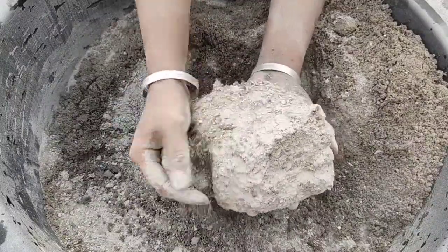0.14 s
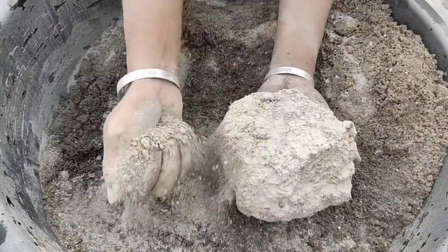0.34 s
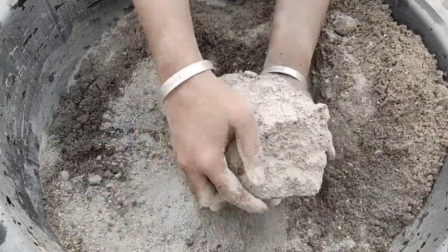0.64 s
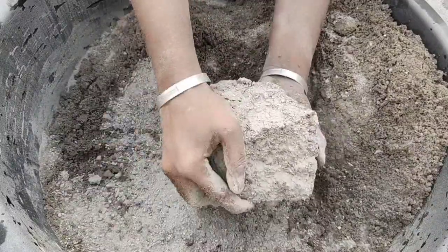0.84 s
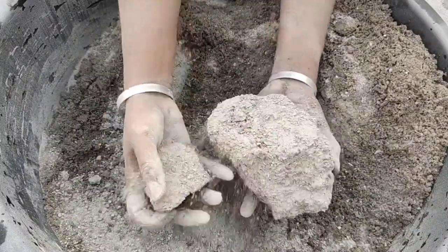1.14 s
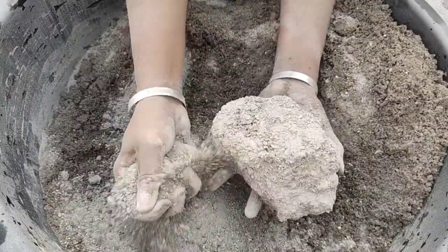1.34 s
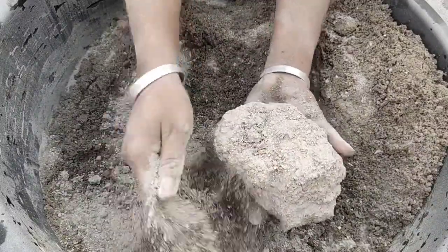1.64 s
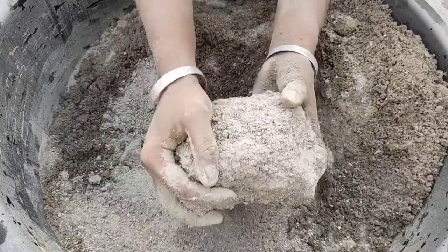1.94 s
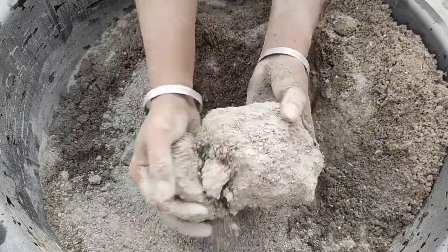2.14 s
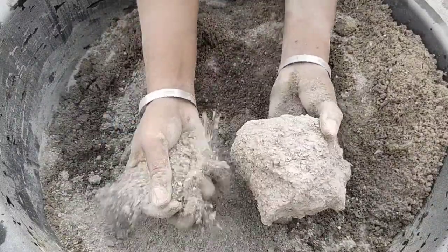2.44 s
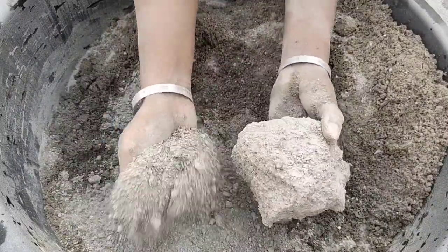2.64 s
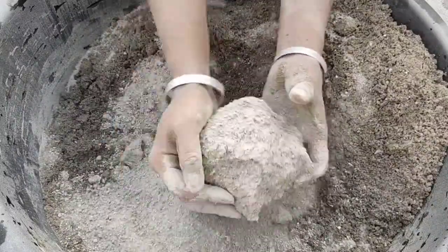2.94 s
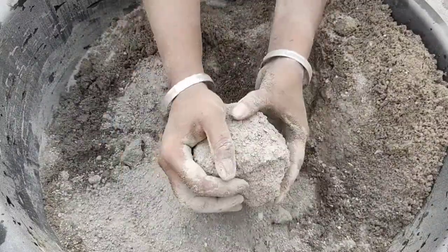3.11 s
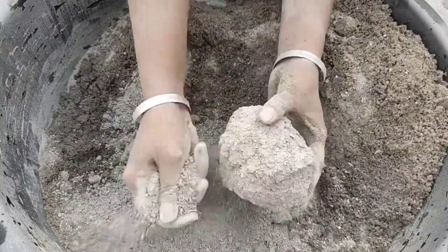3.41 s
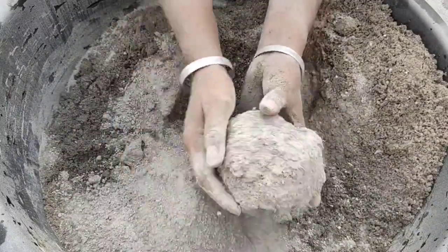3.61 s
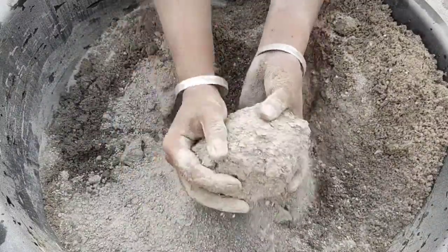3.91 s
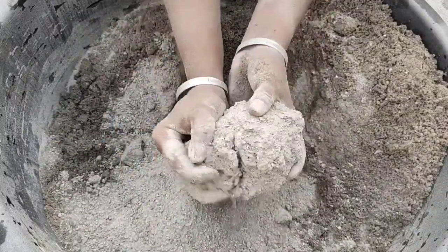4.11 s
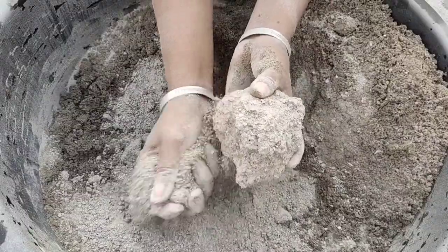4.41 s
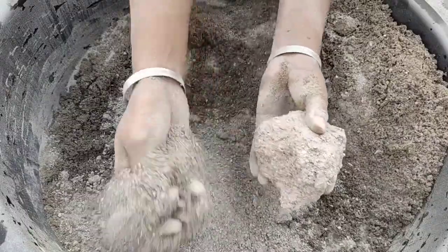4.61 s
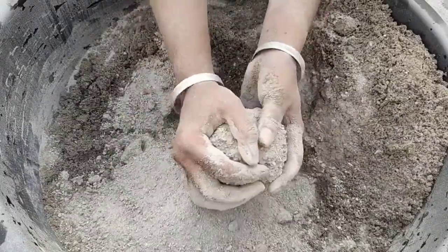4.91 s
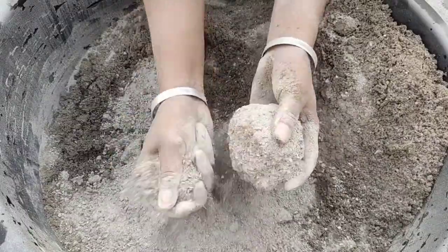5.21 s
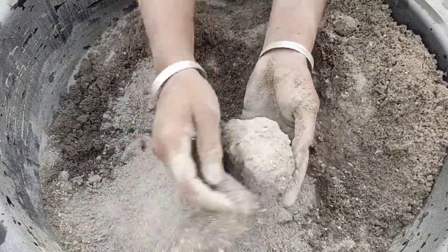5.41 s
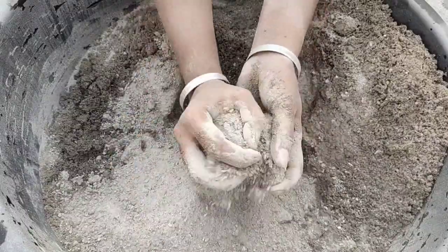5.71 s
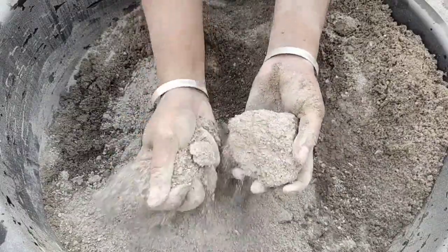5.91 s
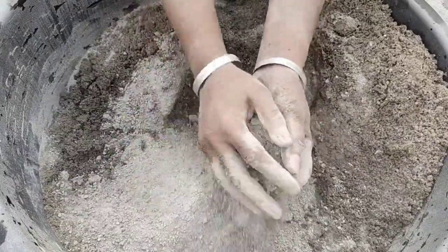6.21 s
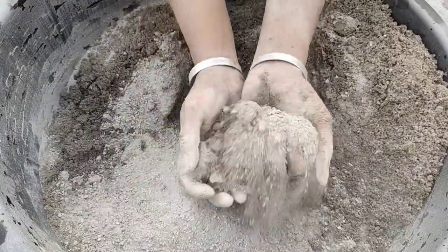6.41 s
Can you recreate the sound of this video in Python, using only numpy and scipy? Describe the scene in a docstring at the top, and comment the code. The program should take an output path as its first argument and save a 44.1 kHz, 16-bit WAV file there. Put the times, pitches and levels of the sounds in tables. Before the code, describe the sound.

Close and dry, hands crumble a compacted gritty lump over loose soil, with a quiet distant rumble and faint hiss behind. A scrape and a short sandy crunch open at 0-0.3 s, and crumbs tick down around 0.5 s. Light rubs lead to scrapes near 0.95 and a fuller squeeze at 1.3; a cluster of crumbs lands with a knock at 1.6. After soft rubbing, a dense, sharp crunch with several scrapes comes at 2.3-2.6, then fine pattering. Scrapes at 3.2 and bright hard grit clicks at 3.5 follow. Rubbing and scrapes from 4.0 lead to the heaviest low clod knock at 4.3 and a broad gritty squeeze at 4.4-4.5. More crunching comes at 5.0-5.25, a bright crumb-and-grit click at 5.4, a squeeze at 5.85 and small clods at 6.1. Palms swish softly around 6.2, fading into light rubs and stray ticking grains.

```python
"""Over a tub of loose soil, with the hands close by: they break up a lump of dry gritty earth and grind it.
Squeezes, rubs and scrapes are filtered streams of random grain slips, swelling and fading with the fingers.
Crumbs patter down as damped ticks and thuds, with knocking clods and a few short bright rings of hard grit.
Stray grains tick thinly throughout and dusty palms swish near the end. The microphone's own resonance near
9 kHz colours sand and ticks. Behind lie a distant rumble and faint hiss of shaped noise."""
import sys
import numpy as np
from scipy import signal
from scipy.fft import rfft, irfft, next_fast_len
from scipy.io import wavfile

SR = 44100
rng = np.random.default_rng(int(sys.argv[2]) if len(sys.argv) > 2 else 0)


def digitize_waveform(pressure):
    """Quantize a signal to 16-bit integers and store it at the path in sys.argv[1].

    Rows of a 2-D input are taken as channels; values are limited to [-1, 1].
    """
    field = np.atleast_2d(pressure).T
    bounded = np.clip(field, -1, 1)
    quanta = np.round(bounded * 32767).astype(np.int16)
    wavfile.write(sys.argv[1], SR, quanta)


N = 288842  # samples, about 6.5 s


def from_db(db):
    """Turn decibels into an amplitude gain."""
    return 10 ** (np.asarray(db) / 20)


def rms_one(x):
    """Scale to rms 1."""
    return x / np.sqrt(np.mean(x ** 2) + 1e-20)


def coloured(x, spectrum):
    """Give a steady texture a spectrum that falls away beyond its ends; rms 1."""
    corner_hz, density_db = np.transpose(spectrum)
    size = next_fast_len(N)
    f = np.maximum(np.fft.rfftfreq(size, 1 / SR), 1)
    low_skirt = np.minimum(f / corner_hz[0], 1) ** 2
    high_skirt = np.minimum(corner_hz[-1] / f, 1) ** 2
    shape_db = np.interp(np.log(f), np.log(corner_hz), density_db)
    gain = from_db(shape_db) * low_skirt * high_skirt
    return rms_one(irfft(rfft(x, size) * gain, size)[:N])


def flutter(rate):
    """Random wander: straight lines between normal random values, rate of them a second."""
    knots = rng.standard_normal(N // 40)
    return np.interp(np.arange(N) / SR * rate, np.arange(N // 40), knots)


def clicks(times, db):
    """Place one impulse at each time."""
    out = np.zeros(N)
    np.add.at(out, np.round(np.asarray(times) * SR).astype(int), from_db(db))
    return out


def ring(x, hz, t60):
    """A unit click starts a damped sine whose envelope begins at 1 and drops 60 dB in t60 seconds."""
    r = from_db(-60 / (t60 * SR))
    w = 2 * np.pi * hz / SR
    return signal.lfilter([0, np.sin(w)], [1, -2 * r * np.cos(w), r * r], x + 1e-18)


def strike(x, modes, scatter_db):
    """Every click excites each mode with a strength of its own; signs alternate from mode to mode."""
    at = np.flatnonzero(x)
    out = np.zeros(N)
    for k, (pitch_hz, level_db, t60_s) in enumerate(modes):
        own = np.zeros(N)
        own[at] = x[at] * from_db(level_db + scatter_db * rng.standard_normal(N)[at])
        out += (-1) ** k * ring(own, pitch_hz, t60_s)
    return out


def high_pass(x, hz):
    """Small things radiate little bass."""
    return signal.sosfilt(signal.butter(2, hz, "high", fs=SR, output="sos"), x)


def dying(hits, decay_s):
    """An envelope jumps at each hit and fades exponentially."""
    return signal.lfilter([1], [1, -np.exp(-1 / (decay_s * SR))], hits + 1e-18)


def grains(per_s, spread_db):
    """Random clicks of either sign, many small and few large."""
    sizes = from_db(spread_db * np.minimum(rng.exponential(1, N), 4))
    present = rng.random(N) < per_s / SR
    return present * sizes * rng.choice([-1, 1], N)


def slips(spectrum, per_s, spread_db, shift_db):
    """A dense stream of slipping grains; the hollow of the moving hand shifts its colour by shift_db."""
    rest = coloured(grains(per_s, spread_db), spectrum)
    out = 0
    for edge_hz in 1000 * np.sqrt(2) ** np.arange(8):  # half-octave bands
        band = signal.sosfiltfilt(signal.butter(4, edge_hz, fs=SR, output="sos"), rest)
        rest = rest - band
        out = out + band * from_db(shift_db * flutter(rate=24))
    return rms_one(out + rest)


def strokes(rows, column, attack_s, release_s, lead_s=0):
    """Each stroke of the hand swells, holds at the level in its dB column, and fades."""
    rows = np.transpose(rows)[:, :, None]
    start_s, held_s = rows[0], rows[1]
    t = np.arange(N) / SR + lead_s - start_s
    away = np.maximum(-t / attack_s, (t - held_s) / release_s)
    return np.max(from_db(rows[column]) * np.exp(-np.clip(away, 0, 20)), axis=0)


# Spectrum of the distant rumble and faint hiss: pitch_hz [Hz], density_db [relative dB per Hz]
BACKGROUND_SPECTRUM = [(15, -15), (50, -9.5), (90, -7.5), (128, -6), (148, 0), (166, 1.5), (180, -2),
                       (240, -4), (400, -12.5), (560, -17), (900, -25.5), (2500, -38.5), (9500, -40),
                       (15000, -37)]


def rumble():
    """Steady random noise, strongest in the bass, lies behind the hands."""
    return from_db(-52) * coloured(rng.standard_normal(N), BACKGROUND_SPECTRUM)


# A broken-off piece is crushed in the fist:
# start_s [s, full pressure], held_s [s], sand_db, earth_db [dB before the trims in grinding]
FIST_SQUEEZES = [(.24, 0.069, -47.5, -45), (1.32, .12, -45, -43.5), (2.43, 0.14, -47, -41.5),
                 (4.415, 0.1, -42.5, -41), (5.185, 0.086, -50.5, -44.5), (5.845, 0.099, -49.5, -44),
                 (6.24, .095, -54, -44)]
# The fingers rub lightly over the lump for a new grip: the same columns
FINGER_RUBS = [(.09, 0.037, -57.5, -58), (.72, 0.04, -64, -71), (.95, 0.08, -61, -64),
               (1.255, 0.034, -48.5, -72), (1.77, 0.11, -53.5, -69), (1.91, 0.24, -53, -73),
               (2.29, 0.069, -47, -55.5), (2.96, 0.071, -54, -62.5), (3.305, 0.029, -52.5, -56),
               (3.6, .17, -62, -72), (3.94, .14, -50, -63), (4.35, 0.035, -55, -49),
               (4.915, 0.045, -55, -61), (5.1, 0.046, -58, -56.5), (5.72, 0.049, -58, -52.5),
               (6.36, 0.044, -68, -51), (6.53, .02, -54.5, -53)]


def pressure(column, holding_db, lead_s):
    """How strongly one grade of earth is ground: squeezes, light rubs and mere holding add in power."""
    squeezing = strokes(FIST_SQUEEZES, column, attack_s=0.025, release_s=0.029, lead_s=lead_s)
    rubbing = strokes(FINGER_RUBS, column, attack_s=0.024, release_s=0.015)
    # the lump never lies quite still in the hand
    holding = from_db(holding_db + 2.5 * flutter(rate=18))
    return np.sqrt(squeezing ** 2 + rubbing ** 2 + holding ** 2)


# Colours of slipping fine sand, with the microphone's resonance near 9 kHz, and of coarse earth;
# also heard in the scrapes and, for earth, the clods: pitch_hz [Hz], density_db [relative dB per Hz]
SAND_SPECTRUM = [(1500, -7), (2500, -7), (3700, -8.5), (5600, -4.5), (6800, -5.5), (7700, -11.5), (8800, 0),
                 (10200, -1.5), (11500, -7.5), (13000, -9.5), (15500, -22.5)]
EARTH_SPECTRUM = [(250, -8.5), (520, -7), (800, -3), (1300, -2.5), (1900, -3.5), (2700, -7.5), (3700, -14),
                  (5900, -15.5), (7900, -17), (12000, -28)]


def grinding():
    """Fine sand hisses and coarse earth rasps; both catch and slip together under the fingers."""
    # in a squeeze the sand runs 10 ms before the coarse earth gives way
    sand_pressure = pressure(column=2, holding_db=-63, lead_s=0.01)
    sand = sand_pressure * slips(SAND_SPECTRUM, per_s=24000, spread_db=6.5, shift_db=0.0)
    earth_pressure = pressure(column=3, holding_db=-78.5, lead_s=0)
    earth = earth_pressure * slips(EARTH_SPECTRUM, per_s=8700, spread_db=4.0, shift_db=2.5)
    catching = from_db(1.9 * flutter(rate=130))
    return (from_db(1.5) * sand + from_db(0.02) * earth) * catching


# Tick of a small falling bit, with the microphone's own ring near 9 kHz, also heard in every crumb:
# pitch_hz [Hz], level_db [relative dB], t60_s [s]
TICK_RESONANCES = [(1740, -4.5, 0.00083), (5200, -3, 0.00042), (9030, -3.5, 0.0012), (12400, -13, 0.0008)]


def trickle():
    """Stray grains keep dropping from the dusty hands with tiny thin ticks."""
    strays = strike(grains(per_s=110, spread_db=2.5), TICK_RESONANCES, scatter_db=1.5)
    return from_db(-44.5) * high_pass(strays, hz=2500)


# A finger catches on the lump and skids:
# peak_s [s, at the strongest], level_db [dB, of the sand before its catching], fall_s [s, dying away]
FINGER_SCRAPES = [(0.03, -41.5, 0.017), (0.233, -42, 0.017), (.677, -49.5, 0.0074), (0.936, -38, 0.0091),
                  (1.002, -50.5, 0.017), (1.292, -36.5, 0.0085), (2.31, -41, 0.0054), (2.381, -38, 0.014),
                  (2.412, -33, 0.0048), (2.455, -31, 0.013), (2.512, -35, 0.012), (3.159, -36, 0.011),
                  (3.182, -39.5, .011), (4.042, -43, .014), (4.112, -37, 0.018), (4.179, -45, 0.013),
                  (4.262, -45, 0.0081), (5.024, -35, 0.011), (5.174, -41, 0.011), (5.581, -50, 0.012),
                  (5.69, -36.5, 0.016), (6.224, -38, 0.023)]


def scraping():
    """Each skid is a quick swell and slower fade of slipping sand that drags some coarse earth along."""
    peak_s, level_db, fall_s = np.transpose(FINGER_SCRAPES)[:, :, None]
    t = np.arange(N) / SR - peak_s
    rise_s = 0.72 * fall_s
    away = np.where(t < 0, (t / rise_s) ** 2, t / fall_s)
    swell = np.sum(from_db(level_db) * np.exp(-np.minimum(away, 20)), axis=0)
    sand = slips(SAND_SPECTRUM, per_s=25000, spread_db=2.4, shift_db=1.8)
    earth = slips(EARTH_SPECTRUM, per_s=10000, spread_db=2.2, shift_db=2.4)
    catching = from_db(1.6 * flutter(rate=220))
    return swell * (sand + from_db(-4.0) * earth) * catching


# Thud of the loose soil under a crumb, also heard in the showers:
# pitch_hz [Hz], level_db [relative dB], t60_s [s]
THUD_RESONANCES = [(867, -3.5, 0.012), (1300, -0.5, 0.0061)]


def landing(hits, pushes):
    """A larger crumb ticks, thuds, and sheds a short spray of fragments."""
    spray = from_db(-12) * dying(hits, decay_s=0.002) * grains(per_s=3500, spread_db=1.2)
    ticks = strike(hits + spray, TICK_RESONANCES, scatter_db=1.5)
    thuds = strike(pushes, THUD_RESONANCES, scatter_db=1.5)
    return from_db(2.9) * high_pass(ticks, hz=600) + from_db(-0.5) * high_pass(thuds, hz=400)


# The largest crumbs land: start_s [s], tick_db, thud_db [dB, click strength before the resonances]
LARGE_CRUMBS = [(0.4453, -21.5, -33), (0.47, -18, -25), (0.4852, -13.5, -25), (0.5025, -9.5, -26.5),
                (0.5114, -14.5, -21.5), (0.5516, -20.5, -33), (1.5795, -24, -44), (1.588, -18, -22.5),
                (1.592, -12, -14.5), (1.6002, -6.5, -27), (1.645, -20, -38), (3.2178, -21, -39),
                (3.231, -14.5, -27), (3.3647, -17, -50), (3.3814, -18.5, -39), (3.5458, -14.5, -26),
                (3.5718, -18.5, -26), (4.3049, -13.5, -21), (4.31, -13, -29), (4.314, -17, -29),
                (4.6082, -21, -58), (4.6682, -21, -33), (4.7119, -19, -51), (4.7799, -26.5, -43),
                (5.395, -20, -33), (5.4069, -12, -27), (5.4254, -5.5, -21), (5.4459, -14.5, -27)]


def crumbs():
    """The largest crumbs stand out from the showers one by one, each ticking and thudding."""
    start_s, tick_db, thud_db = np.transpose(LARGE_CRUMBS)
    return landing(clicks(start_s, tick_db), clicks(start_s, thud_db))


# A handful of small crumbs rains down:
# peak_s [s, at its thickest], tick_db, thud_db [dB], rise_s [s, build-up], fall_s [s, dying away]
CRUMB_SHOWERS = [(.497, -39, -42.5, 0.028, 0.03), (1.6, -28, -33, 0.012, 0.033),
                 (2.732, -41.5, -45.5, 0.036, 0.02), (2.826, -41.5, -50, 0.019, 0.018),
                 (3.392, -40, -43, 0.024, 0.028), (3.526, -26, -31.5, 0.0035, 0.02),
                 (4.314, -31, -32.5, 0.012, 0.011), (4.69, -46, -50.5, 0.063, 0.059),
                 (5.42, -34, -40.5, 0.018, 0.024), (6.085, -40, -45, 0.012, 0.03)]


def showers():
    """Small crumbs rain down, each with a tick and a faint thud; now and then a bigger bit is among them."""
    peak_s, tick_db, thud_db, rise_s, fall_s = np.transpose(CRUMB_SHOWERS)[:, :, None]
    t = np.arange(N) / SR - peak_s
    flow = np.exp(-np.minimum(np.maximum(-t / rise_s, t / fall_s), 20))
    tick_gain = np.sum(flow * from_db(tick_db), axis=0)
    thud_gain = np.sum(flow * from_db(thud_db), axis=0)
    drops = grains(per_s=4000, spread_db=6.0)
    ticks = rms_one(high_pass(strike(drops, TICK_RESONANCES, scatter_db=3.0), hz=577))
    thuds = rms_one(high_pass(strike(drops, THUD_RESONANCES, scatter_db=3.5), hz=400))
    bits = grains(per_s=110, spread_db=1.5)
    bit_hits = bits * tick_gain * from_db(7)
    bit_pushes = bits * thud_gain * from_db(2.5)
    return tick_gain * ticks + thud_gain * thuds + landing(bit_hits, bit_pushes)


# Clods hit the soil: start_s [s], level_db [dB, peak before the bass cut], pitch_hz [Hz], t60_s [s]
FALLING_CLODS = [(1.6010, -14, 875, 0.01), (1.934, -34.5, 536, 0.007), (4.2930, -18.5, 910, 0.014),
                 (4.3192, -2, 407, 0.009), (4.3188, -7.5, 1270, 0.0065), (4.3212, -14, 910, 0.012),
                 (6.0851, -18.5, 856, 0.03), (6.0875, -9, 1000, 0.0034), (6.0912, -11.5, 830, 0.0033)]


def clods():
    """A heavy piece lands with a knock that the soil damps quickly, and crunches as it settles."""
    knocks = np.zeros(N)
    for start_s, level_db, pitch_hz, t60_s in FALLING_CLODS:
        knock = ring(clicks([start_s], [level_db]), pitch_hz, t60_s)
        knocks += high_pass(knock, hz=0.43 * pitch_hz)  # it radiates little far below its pitch
    start_s, level_db, _, _ = np.transpose(FALLING_CLODS)
    settling = dying(clicks(start_s, level_db), decay_s=0.0035)
    crunch = settling * slips(EARTH_SPECTRUM, per_s=10000, spread_db=1.5, shift_db=1)
    return knocks + from_db(-30.5) * high_pass(crunch, hz=830)


# Hard grit knocks together: start_s [s], level_db [dB, click strength before the resonances]
GRIT_KNOCKS = [(3.5140, -13), (3.5156, -9.5), (3.5240, -10.5), (5.4127, -4), (5.4141, -15)]
# Ring heard with the grit, with the microphone's resonance near 9 kHz:
# pitch_hz [Hz], level_db [relative dB], t60_s [s]
GRIT_RESONANCES = [(3230, -15.5, 0.0067), (8000, -8.5, 0.0047), (8680, -9, 0.015), (9480, -3, 0.0045),
                   (12900, -6, 0.0019)]


def hard_grit():
    """Stony bits click with a short bright ring of a few damped modes."""
    start_s, level_db = np.transpose(GRIT_KNOCKS)
    rings = strike(clicks(start_s, level_db), GRIT_RESONANCES, scatter_db=1)
    return high_pass(rings, hz=1500)


# The dusty palms brush past each other: start_s [s, full level], held_s [s], level_db [dB]
PALM_BRUSHES = [(6.183, .005, -41.5), (6.225, 0.034, -37), (6.29, 0.047, -53)]
# Colour of skin on dust: pitch_hz [Hz], density_db [relative dB per Hz]
PALM_SPECTRUM = [(1300, -7), (2100, -0.5), (2900, -3), (4200, -12), (6200, -8), (7800, -9.5)]


def palms():
    """Skin sliding on dust gives a softer, rounder swish."""
    swish = slips(PALM_SPECTRUM, per_s=15000, spread_db=2.2, shift_db=1.8)
    return strokes(PALM_BRUSHES, column=2, attack_s=0.013, release_s=0.016) * swish


def scene():
    """Hands and falling earth close by, over a distant rumble and faint hiss."""
    hands = grinding() + scraping() + palms()
    falling = trickle() + crumbs() + showers() + clods() + hard_grit()
    return (hands + falling + rumble())[None]


def record(dry):
    """At the microphone the top is cut steeply above 15.6 kHz."""
    top_cut = signal.ellip(10, 0.2, 80, 15600, fs=SR, output="sos")  # 0.2 dB ripple, 80 dB down
    return signal.sosfilt(top_cut, dry)


dry = scene()
out = record(dry)
digitize_waveform(out)
```